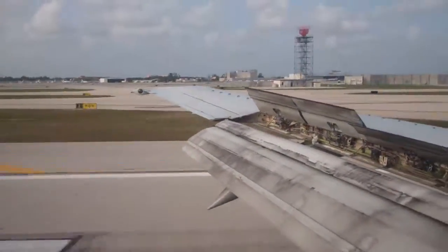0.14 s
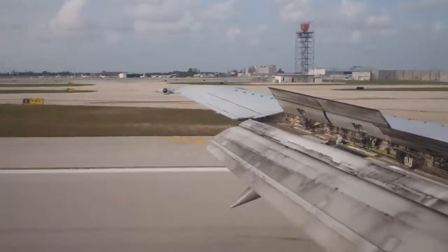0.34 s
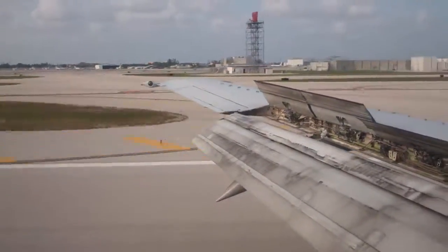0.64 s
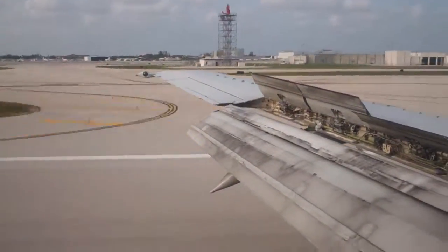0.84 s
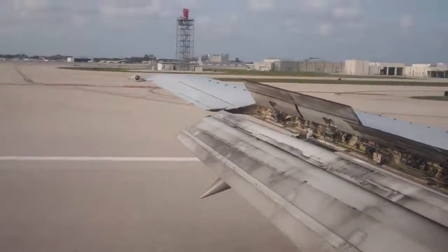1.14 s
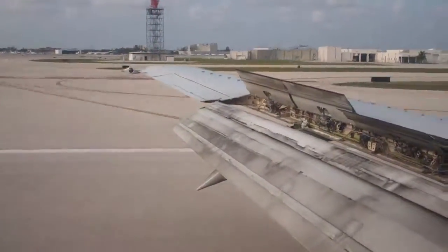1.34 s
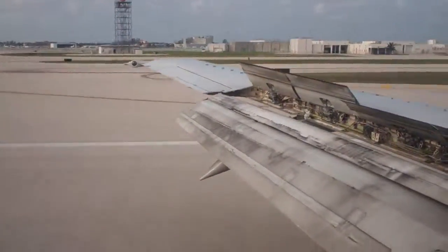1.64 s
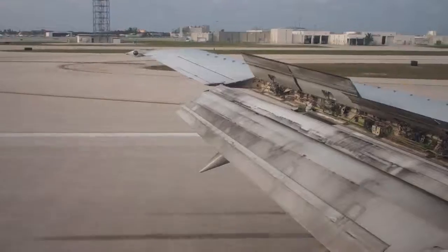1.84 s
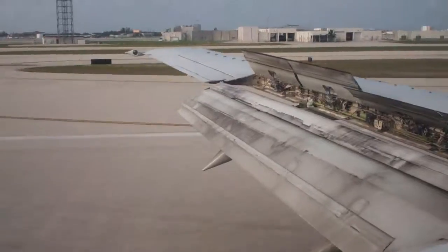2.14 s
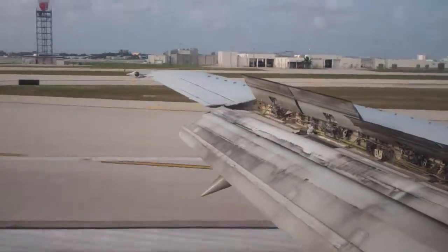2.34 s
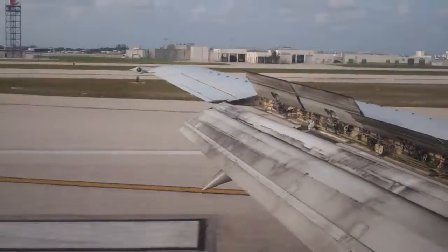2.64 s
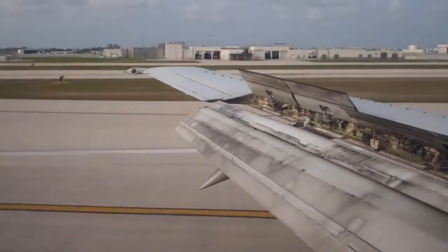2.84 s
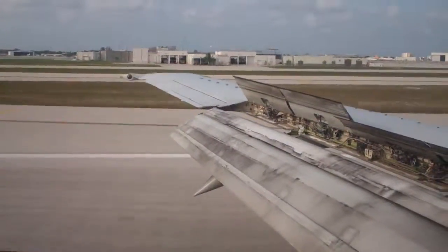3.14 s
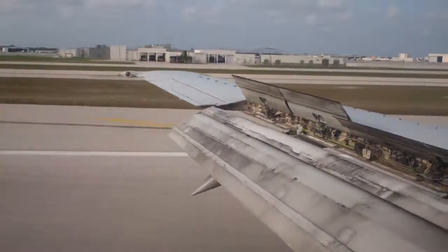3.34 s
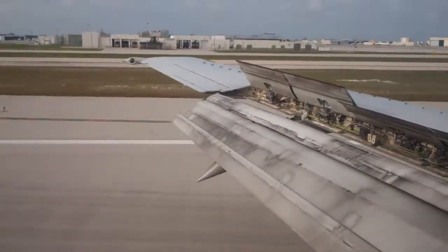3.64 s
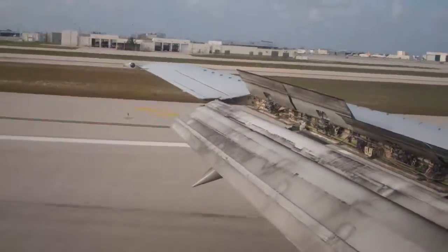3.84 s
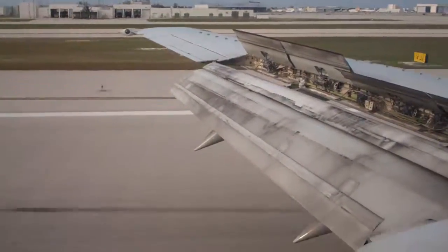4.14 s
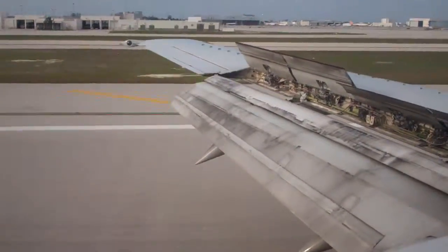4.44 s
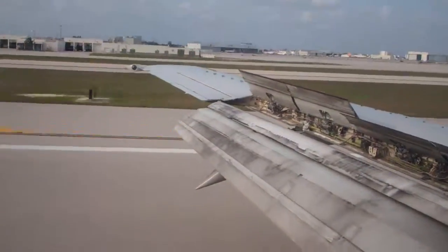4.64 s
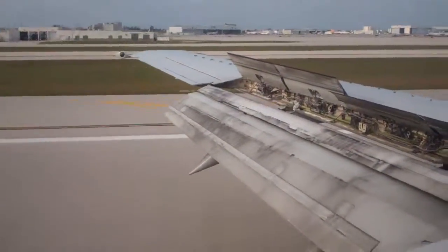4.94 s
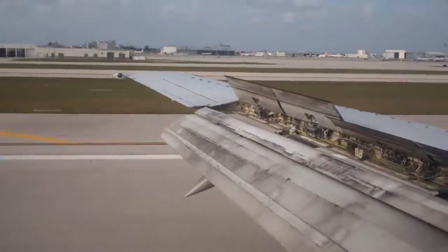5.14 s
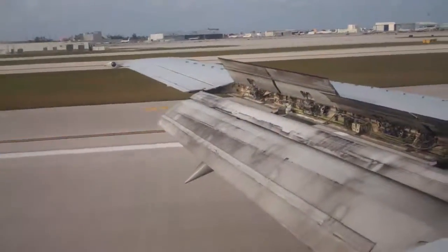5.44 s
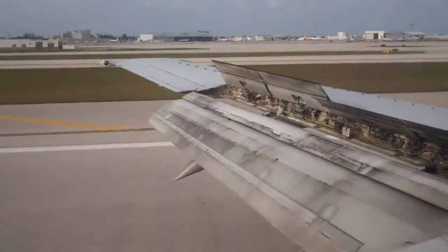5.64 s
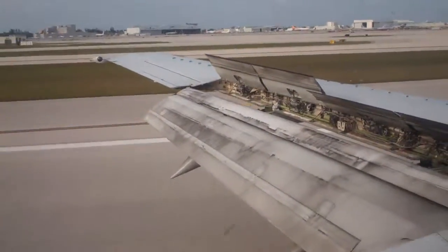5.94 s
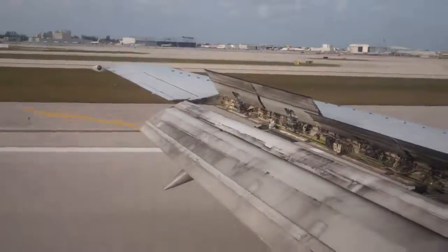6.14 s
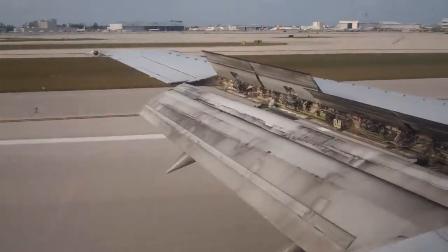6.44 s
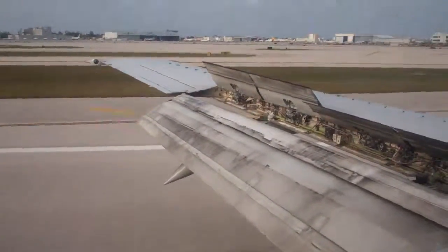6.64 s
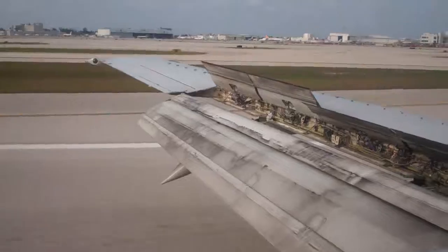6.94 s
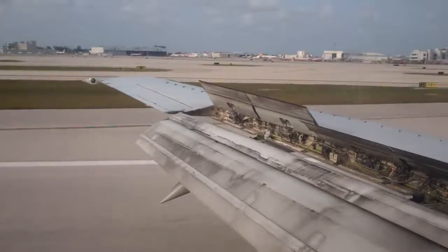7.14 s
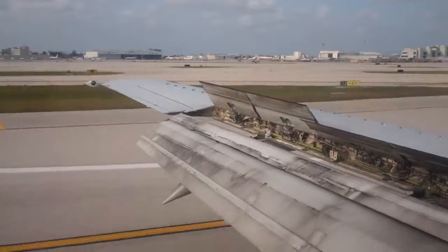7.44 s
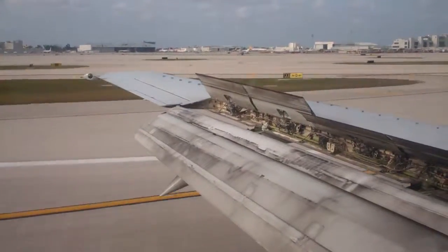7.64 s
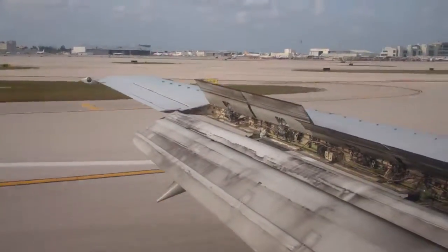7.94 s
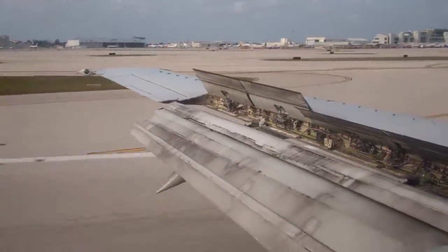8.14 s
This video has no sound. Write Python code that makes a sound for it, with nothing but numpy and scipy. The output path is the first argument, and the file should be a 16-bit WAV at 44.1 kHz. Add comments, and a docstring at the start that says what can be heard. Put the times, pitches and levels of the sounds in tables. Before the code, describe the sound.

Low airliner cabin rumble with small plastic ticks builds from about two seconds into loud, boomy reverse-thrust roar with airy hiss, staying strong.

```python
"""Inside an airliner cabin by a wing window during the landing roll. First the engines idle and the wheels rumble;
the treble starts raised and settles while loose trim ticks and rustles. From 1.5 s reverse thrust spools up, its roar
coloured by cabin and panel resonances, and the rumble and hiss of air grow with it; after 4.3 s it is eased back,
with a partial return. Each source is noise shaped in frequency and level, with a thin whistle in spells. A hand-held
two-port microphone hears the bass nearly alike on both sides and rounds off the highest peaks."""
import sys
import numpy as np
from scipy import signal
from scipy.fft import rfft, irfft
from scipy.io import wavfile
from scipy.ndimage import uniform_filter1d

SR = 44100
rng = np.random.default_rng(int(sys.argv[2]) if len(sys.argv) > 2 else 0)


def waveform_to_disk(signal):
    """Save audio, clipped to [-1, 1], as 16-bit WAV at the path in sys.argv[1]."""
    frames = np.transpose(np.atleast_2d(signal))
    scaled = np.clip(frames, -1, 1) * 32767
    samples = np.round(scaled).astype(np.int16)
    wavfile.write(sys.argv[1], SR, samples)


N = 366030
HZ = np.maximum(np.fft.rfftfreq(N, 1 / SR), 1)

# spectral density of each noise source: (frequency [Hz], relative level per Hz [dB])
ROAR_SPECTRUM = [(40, -69.5), (90, -36), (130, -8), (210, -4), (330, -8), (450, -14), (640, -23.5),
                 (720, -28), (950, -35.5), (2000, -100)]
RUMBLE_SPECTRUM = [(20, -60), (60, 0.5), (80, 5), (105, 8), (125, -2.5), (150, -2.5), (400, -100)]
RUSH_SPECTRUM = [(300, -70), (700, -8), (900, -0.5), (965, 0), (1030, 3.5), (1170, -0.5), (1300, -8),
                 (1450, -8), (1700, -14.5), (2200, -25.5), (5000, -77)]
HISS_SPECTRUM = [(600, -50), (2500, -10), (3800, -1.5), (5000, 0.5), (7500, 0), (11000, -3), (13000, -3),
                 (14500, -2)]
# runway thuds: (frequency [Hz], relative level per Hz [dB])
THUD_SPECTRUM = [(5, -55), (22, -2), (36, -12), (50, 5), (66, -0.5), (85, -5.5), (250, -100)]
# air washing the wall: (frequency [Hz], relative level per Hz [dB])
WASH_SPECTRUM = [(300, -60), (1300, -4.5), (1900, -2), (2700, -4), (3600, -7.5), (6000, -22.5),
                 (14500, -50)]
# cabin resonances on the roar: (frequency [Hz], width at half lift [Hz], lift [dB])
CABIN_RESONANCES = [(142, 35, 1.5), (207.2, 30, 4.5), (230.2, 35, 4), (271.4, 22, 2.5), (296.4, 30, 3.5),
                    (381, 24, -2.5), (391.7, 21.5, 8), (413.2, 26, 4.5), (520, 17, 2.5), (621, 120, 3)]
# close modes of the wall panel: (frequency [Hz], width at half amplitude [Hz], relative level [dB])
PANEL_MODES = [(784.4, 40, -6.5), (812.6, 26, -5), (835, 36, -0.5), (862, 30, -7), (897, 33, -16)]
# microphone pair, side against mid: (frequency [Hz], level [dB])
SIDE_AGAINST_MID = [(60, -29), (110, -29), (200, -30.5), (370, -22), (670, -15), (1230, -9), (2250, -2),
                    (4110, 1), (7520, 0), (13800, 0)]
# microphone pair, left against right: (frequency [Hz], level [dB])
LEFT_AGAINST_RIGHT = [(60, 0.5), (110, 0.5), (200, 0.5), (370, 0.0), (670, 1.0), (1230, 0.5), (2250, 1.5),
                      (4110, 2.5), (7520, 3.0), (13800, 5.8)]

# reverse thrust: (time [s], share of full power [0-1])
THRUST_COURSE = [(0, 0.07), (1.5, .05), (2.0, 0.3), (2.5, 0.65), (2.9, 0.69), (3.3, 0.95), (4.3, 0.95),
                 (5.6, 0.73), (6.6, 0.87), (8.3, 0.66)]
# slow swells: (time [s], panel hum level [dB], airflow rush level [dB],
# upper rush lift [dB], cabin boom lift [dB], lift of wash and hiss [dB])
SLOW_SWELLS = [(0, -28.5, -39, 7.5, -2.5, -1), (.6, -31, -35.5, -2, -0.5, 0.5),
               (1.05, -29.5, -37, 3, -1, 0.3), (1.7, -34, -38, -0.5, 0.5, 0.5),
               (2.4, -28.5, -37.5, 6, -0.5, 0.5), (3.4, -27.5, -34.5, -2, 2.5, 0.6),
               (4.0, -28.5, -33, 0, -1.3, -0.5), (4.6, -27.5, -33.5, 5, 1, 0.5),
               (5.4, -30.5, -36, 0.5, -2, 0), (6.1, -30.5, -36, -0.5, -1.3, 0.5),
               (6.5, -27.5, -34, 1, -2.8, 0.8), (7.0, -28.5, -35.5, 6.5, -0.5, -0.5),
               (7.4, -28, -36.5, 2.5, -1, 0.4), (8.3, -30, -35.5, 1.5, 1, 1.1)]
# slow uneven level of the low roar around 220 Hz: (time [s], level [dB])
LOW_ROAR_LEVEL = [(0, -0.99), (1, -0.22), (1.9, 0.67), (2.7, -1.1), (3.3, 0.8), (3.8, -1.5), (4.15, 2.8),
                  (4.7, -0.27), (5.3, 0.3), (6.1, -0.17), (6.7, 1.6), (7.4, -1.1), (8.3, 0.47)]
# wall wash against its thrust law: (time [s], level [dB])
WASH_LIFT = [(0, 0.6), (1.2, 0), (2.0, -0.5), (2.5, -2.5), (3.0, 1), (4.0, 0.2), (4.6, -1), (5.5, 1),
             (6.5, -0.5), (7.1, -1.5), (7.7, 0.8), (8.3, 0)]

# loose trim, short rows tick and long rows rustle:
# (time [s], peak level of bright part [dB], dull against bright part [dB], ring-out t60 [s])
TRIM_TICKS = [(0.0778, -22.5, -22, 0.012), (0.081, -43, -10, .035), (0.152, -46, -3, 0.11),
              (0.305, -54, 6.5, 0.35), (0.405, -46, -14, .06), (0.492, -46, -1, 0.32),
              (0.637, -40, -15, .04), (0.716, -45, 0, .07), (0.842, -43, -6, .05), (1.0005, -46, 6, .04),
              (1.261, -49, 0, .015), (1.34, -52, 5, .03), (1.4, -50, 1, .1), (1.76, -49, 0, .06),
              (2.1495, -41, 2, 0.12), (2.2145, -37.5, -7, 0.068), (2.283, -42, -14, 0.12),
              (2.497, -38.5, -12, .08), (3.5205, -39, -14, .07), (4.522, -39, -11, 0.085),
              (4.578, -36, -13, .12), (4.593, -37, -9, 0.12), (4.615, -42, -8, .1),
              (5.1065, -35, -16, .035), (6.296, -38, -10, .06), (6.588, -39, -12, .06),
              (6.674, -38, -10, .045), (7.012, -36, -15, .05), (7.096, -39, -14, .08),
              (7.113, -38, -14, .05), (7.279, -37, -16, .04), (8.217, -37, -14, .06)]
# coloured ticks and rustles of trim, each in its own narrow or broad band:
# (time [s], peak level [dB], band centre [Hz], band width [Hz], ring-out t60 [s])
COLOURED_TICKS = [(0.0778, -30, 5800, 1200, .014), (4.56, -48, 4500, 3000, .35),
                  (0.315, -46, 4200, 1200, .2), (0.342, -47, 3500, 700, .3), (0.395, -50, 3700, 1200, .2),
                  (0.497, -47, 8200, 600, 0.13), (0.553, -49, 9700, 500, .04),
                  (0.565, -45, 4200, 2500, 0.11), (1.04, -51, 6500, 2500, .4), (1.47, -49, 6000, 1500, .25),
                  (1.83, -51, 3200, 500, .25), (2.15, -38, 3100, 1400, .06), (2.215, -44, 2400, 900, .04),
                  (2.235, -50, 4500, 900, .15), (2.37, -48, 11500, 2500, .08), (4.475, -46, 5000, 1500, .2),
                  (4.715, -45, 4400, 1800, .1)]
# spells of the whistle: (start time [s], length [s])
WHISTLE_SPELLS = [(0.68, .12), (1.03, .22), (2.04, .22), (2.62, .08), (5.24, .18), (6.66, .1), (7.68, .08),
                  (7.85, .16)]

# source levels (dB at zero thrust, dB at full thrust)
ROAR_DB, RUMBLE_DB, WASH_DB, HISS_DB = (-16.5, -9), (-26, -21.5), (-53, -46), (-52.5, -45)
ROAR_UPPER_HZ, ZERO_THRUST_UPPER_DB = 427, 2.5
BOOM_HZ, BOOM_WIDTH_HZ = 292, 64
LOW_ROAR_HZ, LOW_ROAR_WIDTH_HZ = 221, 47
THUD_DB, BUMPY_DB, BUMPS_PER_S = -30.5, 2, 3.6
RUSH_UPPER_HZ = 1300
SETTLE_DB, SETTLE_S = 5, 0.68  # the treble starts this much raised; time constant of its decay
FLUTTER_DB, FLUTTER_PER_S = 0.73, 22
TICK_DULL_HZ, TICK_BRIGHT_HZ = 2380, 7900  # lower edges of the dull and the bright part
RATTLE_PER_S, RATTLE_DB, RATTLE_SCATTER_DB, RATTLE_T60_S = 14, -56, 1.8, .06
GRAIN_DB, GRAIN_S, GRAIN_FULL_S = 2.5, .003, .08  # level jumps, step, and t60 at which they are full
RISE_SHARE = 0.063  # a burst rises over this share of its ring-out
WHISTLE_HZ, WHISTLE_WIDTH_HZ, WHISTLE_DB, WHISTLE_FADE_S = 10445, 28, -66, .03
KNEE, FULL_SCALE = 16, 1.02  # sharpness and ceiling of the peak rounding
TOP_HZ, FADE_S = 14180, .004


def undb(db):
    """Level law: twenty decibels are a factor of ten in amplitude."""
    return 10 ** (np.asarray(db) / 20)


def over_hz(table):
    """Interpolation: a (Hz, dB) table is read on a log-frequency axis."""
    hz, db = np.transpose(table)
    return np.interp(np.log(HZ), np.log(hz), db)


def columns(table):
    """Interpolation: each column after the time gets a value for every sample."""
    time_s, *cols = np.transpose(table)
    return [np.interp(np.arange(N) / SR, time_s, col) for col in cols]


def powered(db_range, thrust):
    """Linear level law: decibels climb from zero to full thrust."""
    low_db, high_db = db_range
    return undb(low_db + (high_db - low_db) * thrust)


def walk(rate):
    """Smoothed random process: levels held 1 / rate s and slewed twice, spread near 1."""
    hold = int(SR / rate)
    held = np.repeat(rng.standard_normal(N // hold + 1), hold)
    slewed = uniform_filter1d(uniform_filter1d(held, hold), hold)
    return 1.3 * slewed[:N]


def bell(hz, width_hz, order):
    """Resonance curve: 1 at the centre, half at the width; a higher order has steeper skirts."""
    return 1 / (1 + np.abs(2 * (HZ - hz) / width_hz) ** order)


def stereo(gain):
    """Partial coherence: left and right share one noise; a difference by frequency parts them."""
    mid, side = rfft(rng.standard_normal((2, N))) * gain
    side = side * undb(over_hz(SIDE_AGAINST_MID))
    lean = undb(over_hz(LEFT_AGAINST_RIGHT) / 2)
    pair = irfft(np.array([(mid + side) * lean, (mid - side) / lean]), N)
    return pair / np.std(pair.mean(axis=0))


def lift_above(x, hz, lift_db):
    """High-pass shelf: the part of a sound above hz is raised or lowered."""
    upper = irfft(rfft(x) / (1 + (hz / HZ) ** 8), N)
    return x + (undb(lift_db) - 1) * upper


def lift_band(x, hz, width_hz, lift_db):
    """Band equalisation: a band of a sound is raised or lowered."""
    band = irfft(rfft(x) * bell(hz, width_hz, order=4), N)
    return x + (undb(lift_db) - 1) * band


def roar():
    """Turbulence noise and resonance: jet roar through the wall, lifted at cabin modes, buffets a little."""
    lifts_db = sum(lift_db * bell(hz, width, order=2) for hz, width, lift_db in CABIN_RESONANCES)
    return stereo(undb(over_hz(ROAR_SPECTRUM) + lifts_db)) * undb(0.81 * walk(14))


def engines(thrust, boom_db):
    """Power-dependent spectrum: bass grows most with thrust; cabin boom swells, low roar is slowly uneven."""
    upper_db = ZERO_THRUST_UPPER_DB * (1 - thrust)
    sound = powered(ROAR_DB, thrust) * lift_above(roar(), ROAR_UPPER_HZ, upper_db)
    sound = lift_band(sound, BOOM_HZ, BOOM_WIDTH_HZ, boom_db)
    low_roar_db, = columns(LOW_ROAR_LEVEL)
    return lift_band(sound, LOW_ROAR_HZ, LOW_ROAR_WIDTH_HZ, low_roar_db)


def gear(thrust):
    """Random excitation: an uneven runway makes rumble and thuds lumpy; the rumble grows with thrust."""
    rumble = stereo(undb(over_hz(RUMBLE_SPECTRUM)))
    rumble = powered(RUMBLE_DB, thrust) * undb(1.1 * walk(3.9)) * rumble
    thud_gain = undb(THUD_DB + BUMPY_DB * walk(BUMPS_PER_S))
    return rumble + thud_gain * stereo(undb(over_hz(THUD_SPECTRUM)))


def panel():
    """Forced resonance: a wall panel shaken by the airflow hums in a narrow steep band."""
    return stereo(sum(undb(db) * bell(hz, width, order=3) for hz, width, db in PANEL_MODES))


def rush(upper_db):
    """Flow noise: air along the fuselage; its upper part swells more than the rest."""
    sound = stereo(undb(over_hz(RUSH_SPECTRUM)))
    return lift_above(sound, RUSH_UPPER_HZ, upper_db) * undb(0.66 * walk(10))


def air(thrust):
    """Flow noise: air from the reversers washes the wall and vents hiss above it; both flicker together."""
    flicker = undb(.55 * walk(9) + .7 * walk(40))
    settle = undb(SETTLE_DB * np.exp(-np.arange(N) / SR / SETTLE_S))
    wash_db, = columns(WASH_LIFT)
    wash_gain = undb(wash_db + FLUTTER_DB * walk(FLUTTER_PER_S))  # the wash also flutters on its own
    wash = wash_gain * powered(WASH_DB, thrust) * stereo(undb(over_hz(WASH_SPECTRUM)))
    hiss = powered(HISS_DB, thrust) * stereo(undb(over_hz(HISS_SPECTRUM)))
    return settle * flicker * (wash + hiss)


def faint_rattles():
    """Random arrivals: faint ticks fall anywhere, with exponentially scattered decibels."""
    count = int(RATTLE_PER_S * N / SR)
    when, size, tone = rng.random((count, 3)).T
    time_s = N / SR * when
    peak_db = RATTLE_DB - RATTLE_SCATTER_DB * np.log(1 - size)
    dull_db = 2 - 14 * tone
    return list(zip(time_s, peak_db, dull_db, np.full(count, RATTLE_T60_S)))


def trim():
    """Impact noise: loose plastic ticks and rustles in decaying bursts with a dull and a bright part."""
    t = np.arange(SR // 2) / SR
    f = np.fft.rfftfreq(len(t), 1 / SR) + 1
    dull = 1 / (1 + (TICK_DULL_HZ / f) ** 4) / (1 + (f / TICK_BRIGHT_HZ) ** 4)
    dull /= np.linalg.norm(dull)
    bright = 1 / (1 + (TICK_BRIGHT_HZ / f) ** 4)
    bright /= np.linalg.norm(bright)
    step = int(GRAIN_S * SR)
    out = np.zeros((2, N + len(t)))
    for time_s, db, dull_db, t60 in [*TRIM_TICKS, *faint_rattles()]:
        colour = bright + undb(dull_db) * dull
        burst = irfft(rfft(rng.standard_normal((2, len(t)))) * colour, len(t)) * np.sqrt(len(f))
        rise = np.minimum(t / max(RISE_SHARE * t60, .0003), 1)
        shape = np.exp(-np.log(1000) * t / max(t60, .005)) * rise
        # ragged level, less so in short ticks
        jumps = np.repeat(rng.standard_normal(len(t) // step + 1), step)[:len(t)]
        grain = undb(GRAIN_DB * min(t60 / GRAIN_FULL_S, 1) * jumps)
        i = int(time_s * SR)
        out[:, i:i + len(t)] += undb(db) * shape / shape.max() * grain * burst
    return out[:, :N] * undb([[2.3], [-2.3]])  # the left port faces the wall


def coloured_trim():
    """Band-filtered noise: coloured ticks and rustles of trim, bursts each in its own narrow or broad band."""
    t = np.arange(SR // 2) / SR
    f = np.fft.rfftfreq(len(t), 1 / SR)
    out = np.zeros((2, N + len(t)))
    for time_s, db, hz, width, t60 in COLOURED_TICKS:
        band = 1 / (1 + (2 * (f - hz) / width) ** 2)
        burst = irfft(rfft(rng.standard_normal((2, len(t)))) * band, len(t))
        shape = np.exp(-np.log(1000) * t / t60) * np.minimum(t / (RISE_SHARE * t60), 1)
        i = int(time_s * SR)
        out[:, i:i + len(t)] += undb(db) * shape / shape.max() * burst / burst.std()
    return out[:, :N] * undb([[1.5], [-1.5]])  # louder on the left


def whistle():
    """Narrow-band noise: a very thin band high up is heard as a faint whistle, in short spells."""
    t = np.arange(N) / SR
    on = sum(1. * ((t > start) & (t < start + length)) for start, length in WHISTLE_SPELLS)
    gate = uniform_filter1d(on, int(WHISTLE_FADE_S * SR))
    return stereo(bell(WHISTLE_HZ, WHISTLE_WIDTH_HZ, order=2)) * undb(WHISTLE_DB) * gate


def scene():
    """Superposition: the pressures of all sources add."""
    thrust, = columns(THRUST_COURSE)
    hum_db, rush_db, upper_db, boom_db, air_db = columns(SLOW_SWELLS)
    cabin = engines(thrust, boom_db) + gear(thrust)
    wall = undb(hum_db) * panel() + undb(rush_db) * rush(upper_db)
    treble = undb(air_db) * air(thrust)
    return cabin + wall + treble + trim() + coloured_trim() + whistle()


def record(dry):
    """Saturation and band limiting: ends fade briefly, the highest peaks bend over, the top is cut steeply."""
    to_nearest_end = np.minimum(np.arange(N), np.arange(N)[::-1]) / SR
    dry = dry * np.minimum(to_nearest_end / FADE_S, 1)
    rounded = dry / (1 + np.abs(dry / FULL_SCALE) ** KNEE) ** (1 / KNEE)
    low_pass = signal.ellip(16, .3, 90, TOP_HZ, fs=SR, output="sos")
    return np.clip(signal.sosfilt(low_pass, rounded), -1, 1)


dry = scene()
out = record(dry)
waveform_to_disk(out)
```